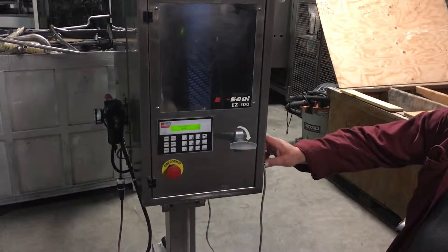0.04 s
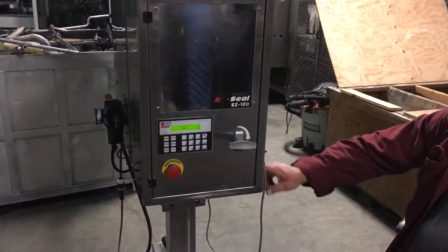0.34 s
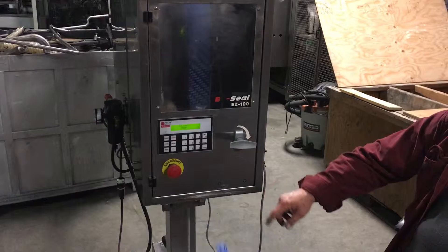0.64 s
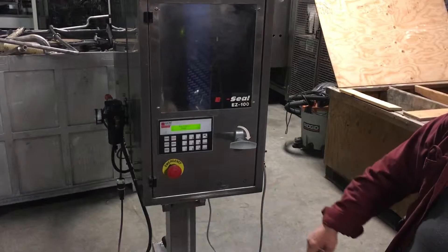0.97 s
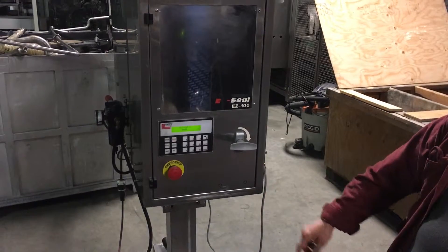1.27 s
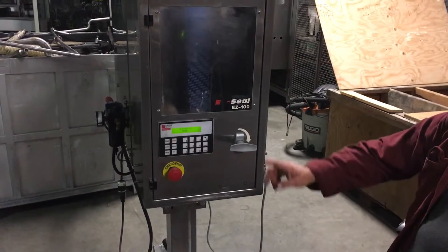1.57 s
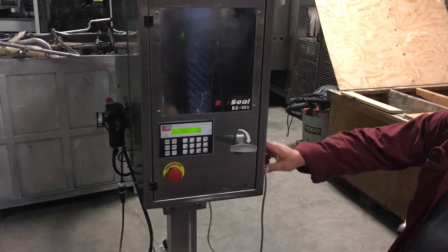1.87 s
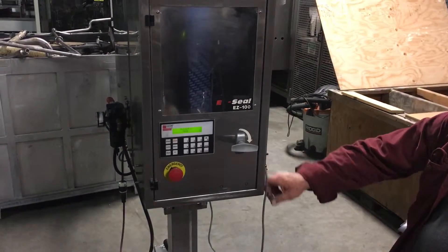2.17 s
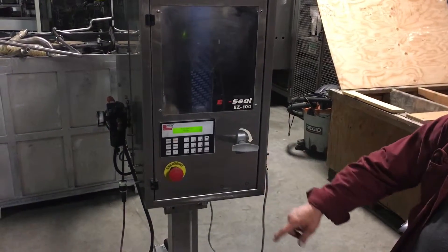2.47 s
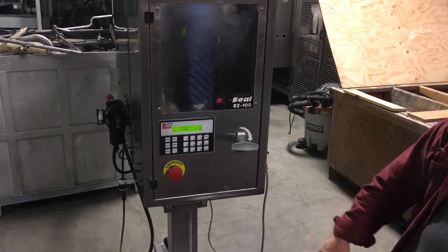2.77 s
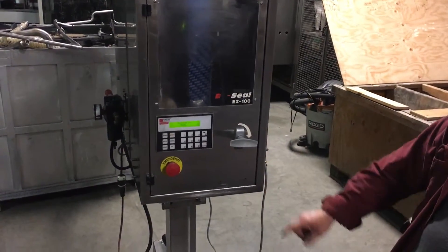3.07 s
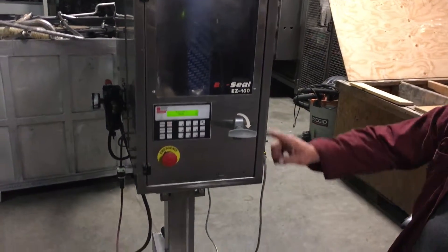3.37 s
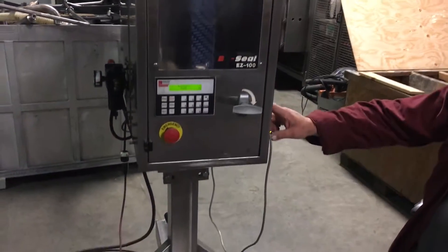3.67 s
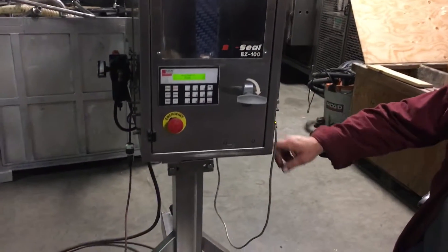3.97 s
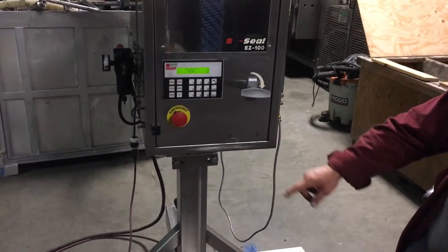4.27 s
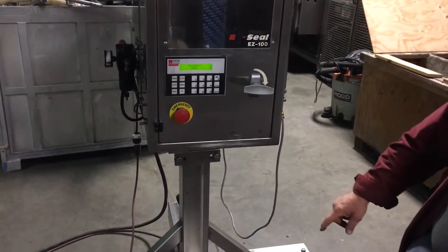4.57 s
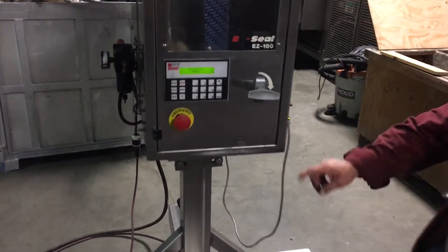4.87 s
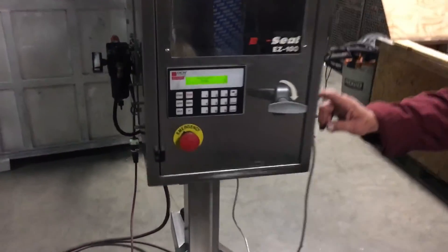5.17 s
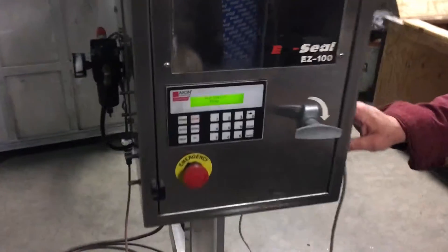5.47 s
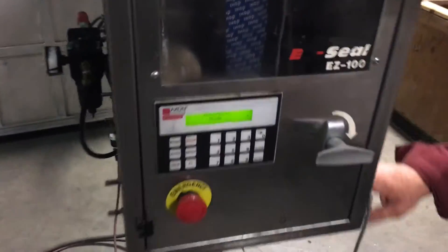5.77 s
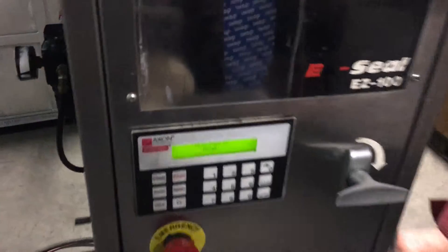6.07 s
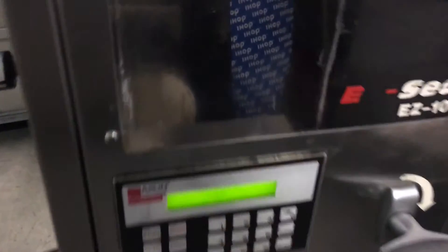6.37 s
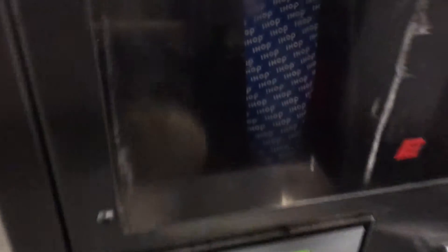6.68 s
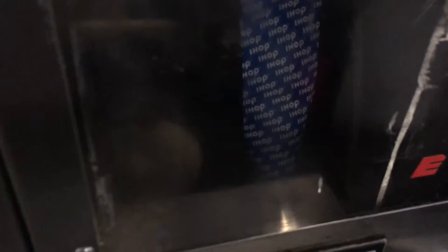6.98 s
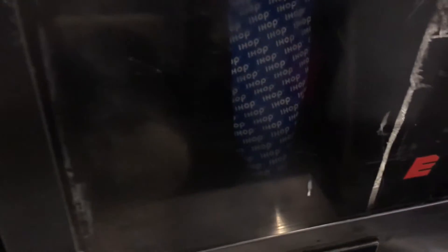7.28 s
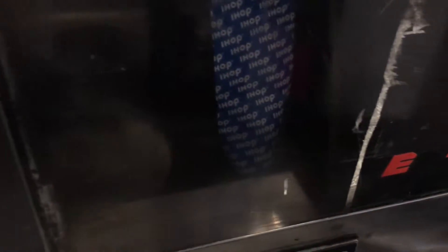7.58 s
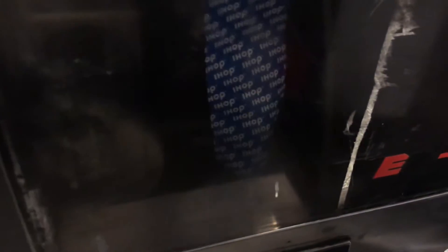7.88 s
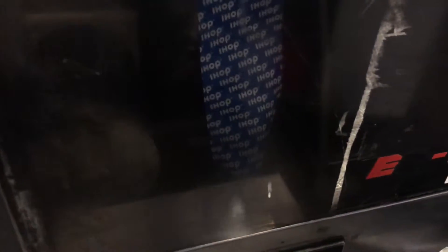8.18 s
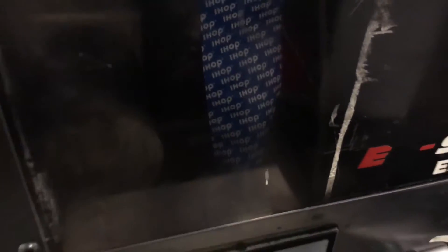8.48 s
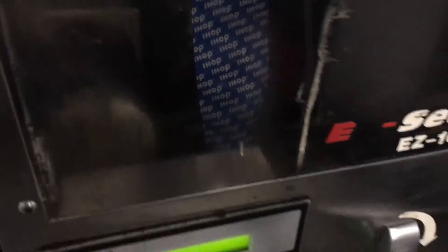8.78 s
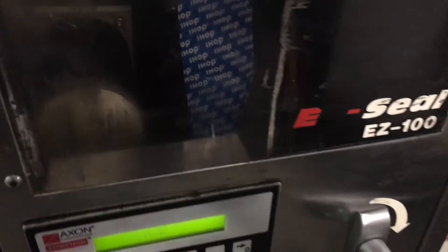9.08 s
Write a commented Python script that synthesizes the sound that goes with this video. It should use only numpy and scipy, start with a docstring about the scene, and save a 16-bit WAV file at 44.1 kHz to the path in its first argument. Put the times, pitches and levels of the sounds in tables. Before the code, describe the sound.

A low warehouse hum and steady hiss run throughout, with the thin whine and very high singing of a labelling machine's idle motors. The machine runs five cycles, starting at about 0.5, 2.2, 4.0, 5.9 and 7.7 seconds, each lasting roughly 0.7 seconds. In each, the drive jolts, metal clacks twice with a short steely ring, plastic film scrapes faintly, and air valves spit twice, with a blade knocking between the spits. The motors then brake with a rattling thud, and the steel cabinet booms briefly with a short echo. The whine drops out during each cycle and returns afterwards. Faint ticks come near 1.3, 3.0, 6.7 and 7.0 seconds. The microphone stands back at first and moves up to the cabinet from about 5 seconds, so the last two cycles are louder, with more deep rumble.

```python
"""A warehouse hums, and the held motors of a shrink-sleeve labelling machine whine and hiss over it.
The machine is jogged through five cycles. In each the drive jolts, metal clacks twice on its end stops,
air valves spit twice, and stepper motors brake and shake the steel cabinet.
The microphone stands back at first, then moves up to the cabinet window for the last two cycles."""
import sys
import numpy as np
from scipy import signal
from scipy.fft import rfft, irfft, next_fast_len
from scipy.io import wavfile
from scipy.ndimage import uniform_filter1d

SR = 44100
rng = np.random.default_rng(int(sys.argv[2]) if len(sys.argv) > 2 else 0)


def log_audio(samples):
    """Write samples as a 16-bit WAV file to the path given in sys.argv[1]."""
    # one column per channel
    frames = np.atleast_2d(samples).T
    # limit to full scale, then quantise
    limited = np.clip(frames, -1, 1)
    pcm = np.round(limited * 32767).astype(np.int16)
    wavfile.write(sys.argv[1], SR, pcm)


N = 407043
T = np.arange(N) / SR

# Presses of the jog button. Each row: start in seconds, slack in the drive in seconds, level offsets
# in dB of first clack, feed brake and film scrape, lateness of the stop in seconds.
CYCLES = [(0.456, 0.025, -6, 0.5, -1, 0), (2.245, 0, 0, -1.5, 1.5, 0), (4.026, 0, 0, -19, 6.5, 0.014),
          (5.863, 0, 0, 0.5, 1.5, 0), (7.653, 0, -0.5, -0.5, 3, 0)]
# The steel of the mechanism. Each row: frequency in Hz, width in Hz, relative level in dB.
STEEL_MODES = [(576.4, 9.4, 4), (701, 22, 4), (800, 50, -6), (897, 43, 9), (1020, 33, -14), (1110, 33, -3),
               (1540, 120, 1), (1726, 100, -3.5), (2070, 66, -16), (2310, 140, -5.5), (5920, 72, -7),
               (6430, 68, -6.5), (7100, 67, -5.5), (9500, 110, -8)]
# The colour of rattling parts. Each row: frequency in Hz, relative level in dB.
RATTLE_COLOUR = [(40, -40), (100, -25), (200, 19), (350, 5), (480, 9), (620, 7.5), (900, 2.5), (1600, -7.5),
                 (2600, -10.5), (4400, -12), (7000, -37), (16000, -56)]


def from_db(db):
    return 10 ** (np.asarray(db) / 20)


def rms_one(x):
    return x / np.sqrt(np.mean(x ** 2) + 1e-20)


def at_hz(points, hz):
    """A curve read on a log-frequency axis."""
    f, value = np.transpose(points)
    return np.interp(np.log(np.maximum(hz, 1)), np.log(f), value)


def convolve(x, response):
    """Pass x through a response scaled to unit energy."""
    return signal.fftconvolve(x, response / np.linalg.norm(response))[:N]


def noise(colour):
    """Steady noise of a given colour, rms 1."""
    size = next_fast_len(N)
    gain = from_db(at_hz(colour, np.fft.rfftfreq(size, 1 / SR)))
    return rms_one(irfft(rfft(rng.standard_normal(size)) * gain, size)[:N])


def drift(rate_hz):
    """A slow random wander, rms 1."""
    return rms_one(np.interp(T * rate_hz, np.arange(400), rng.standard_normal(400)))


def whistle(hz, width_hz):
    """A breathy tone: slow noise carried on a steady or moving pitch, rms 1."""
    lowpass = signal.butter(2, width_hz / 2, fs=SR, output="sos")
    slow = signal.sosfilt(lowpass, rng.standard_normal((2, N)))
    phase = 2 * np.pi * np.cumsum(np.full(N, hz)) / SR
    return rms_one(slow[0] * np.cos(phase) + slow[1] * np.sin(phase))


def play(events, shape):
    """One copy of shape for each event, a row of start in seconds and level in dB."""
    out = np.zeros(N + len(shape))
    for s, db in events:
        start = max(round(s * SR), 0)
        out[start:start + len(shape)] += from_db(db) * shape
    return out[:N]


def swell(rise_s, decay_s):
    """An envelope that climbs to 1 and dies away."""
    t = T[:SR // 2]
    return np.minimum(t / rise_s, 1) ** 2 * np.exp(-np.maximum(t - rise_s, 0) / decay_s)


def ring(force, modes):
    """Resonances driven by a force: damped sines, the wider the shorter."""
    t = T[:SR // 2]
    sines = ((-1) ** k * from_db(db) * width * np.exp(-np.pi * width * t) * np.sin(2 * np.pi * hz * t)
             for k, (hz, width, db) in enumerate(modes))
    return convolve(force, sum(sines))


def boom(force, modes, build_s):
    """Slowly dying low modes that build up as the blow spreads through the metal."""
    t = T[:SR]
    sway = sum(from_db(db - 60 * t / t60) * np.sin(2 * np.pi * hz * t) for hz, db, t60 in modes)
    return convolve(force, sway * np.minimum(t / build_s, 1))


def nearness(s):
    """The microphone's approach at time s, as a gain in dB that each source scales for itself."""
    # The walk up to the cabinet window. Each row: time in seconds, gain in dB.
    approach = [(0, 0), (4.8, 0), (6.1, 4), (7.6, 5), (9.2, 5)]
    return np.interp(s, *np.transpose(approach))


def each_cycle(steps, follows=0, late_s=0, extra_db=0):
    """Repeat steps (seconds into the cycle, dB) in all cycles; follows scales the approach gain."""
    starts = np.array(CYCLES)[:, 0] + late_s
    return np.vstack([np.column_stack([starts + s, db + extra_db + follows * nearness(starts + s)])
                      for s, db in steps])


def pause(off_s, on_s, return_s):
    """A gain that falls quickly to 0 in every cycle and later climbs back to 1."""
    return 1 - sum(np.clip((T - start - off_s) / 0.015 + 1, 0, 1)
                   * np.clip(1 - (T - start - on_s) / return_s, 0, 1) for start, *_ in CYCLES)


def room_tone():
    """The warehouse's rumble, a steady hiss and the low hum of motors."""
    # The colours of rumble and hiss. Each row: frequency in Hz, relative level in dB.
    rumble_colour = [(20, -36), (35, -9), (54, 2), (82, -7.5), (150, -7.5), (200, -10), (320, -23.5),
                     (450, -15), (680, -16), (900, -22), (1400, -15), (2000, -21.5), (2800, -36),
                     (6000, -61)]
    hiss_colour = [(1500, -25), (2650, -16.5), (3500, -10.5), (5000, -8.5), (7800, -8), (9500, -8),
                   (11000, -6), (13000, -7.5), (16000, -6)]
    # Motor hum. Each row: frequency in Hz, rms level in dB.
    hum_tones = [(58, -58.5), (148, -63)]
    hum = sum(from_db(db) * whistle(hz, width_hz=2.8) for hz, db in hum_tones)
    rumble = from_db(-51.5 + 0.73 * nearness(T)) * noise(rumble_colour)
    hiss = from_db(-47 + 0.31 * nearness(T)) * noise(hiss_colour)
    return rumble + hiss + hum


def hall(x):
    """The warehouse's diffuse reverberation, each octave dying at its own pace."""
    # The tail's colour. Each row: frequency in Hz, relative level in dB.
    colour = [(120, -5), (400, -0.5), (900, -4), (1800, -1.1), (3600, -0.5), (7000, -3), (14000, -6.5)]
    # Its length. Each row: frequency in Hz, seconds to fall 60 dB.
    t60 = [(100, 0.32), (500, 0.61), (2000, 0.5), (6000, 0.64), (16000, .3)]
    t, tails = T[:SR], 0
    for low_hz in 80 * 2 ** np.arange(8):
        octave = signal.butter(2, [low_hz, 2 * low_hz], "band", fs=SR, output="sos")
        band = signal.sosfilt(octave, rng.standard_normal((2, SR)))
        centre_hz = low_hz * np.sqrt(2)
        tails = tails + band * from_db(at_hz(colour, centre_hz) - 60 * t / at_hz(t60, centre_hz))
    one, other = (convolve(x, tail * np.minimum(t / 0.0032, 1)) for tail in tails)
    # Two tails blend at random, so the echo shimmers instead of ringing on fixed pitches.
    blend = 2 * np.pi * drift(rate_hz=3)
    return one * np.cos(blend) + other * np.sin(blend)


def held_motors():
    """Chopped holding current makes the motors whine and sing while they stand still."""
    # The whine at rest. Each row: time in seconds, pitch in Hz, rms level in dB.
    whine_curve = [(0, 1247, -55.5), (4, 1245, -55.5), (5.7, 1247, -52), (7.2, 1342, -55), (9.2, 1268, -58)]
    # The highest singing. Each row: frequency in Hz, width in Hz, relative level in dB.
    singing_bands = [(9810, 630, -3), (12250, 740, -3), (14650, 700, -3.5)]
    surge_s, surge_db = 0.05, 5.5   # the whine is louder while the drive first takes up load
    times, pitches, levels = np.transpose(whine_curve)
    loaded = sum((T > start) & (T < start + surge_s) for start, *_ in CYCLES)
    whine_db = np.interp(T, times, levels) + surge_db * loaded
    whine = from_db(whine_db) * whistle(np.interp(T, times, pitches), width_hz=95)
    whine += from_db(-66 + 1.5 * nearness(T)) * whistle(1694, width_hz=45)
    whine *= pause(off_s=surge_s, on_s=0.74, return_s=0.23)
    singing = whistle(8770 + 60 * drift(rate_hz=9.4), width_hz=460)
    singing += sum(from_db(db) * whistle(hz, width) for hz, width, db in singing_bands)
    singing *= from_db(-55.5 + 0.52 * nearness(T) + 1.6 * drift(rate_hz=6))
    singing *= pause(off_s=0.04, on_s=0.48, return_s=0.17)   # silent while the film is fed
    return whine + singing


def loose_parts():
    """Loose parts knock in every cycle and faintly ring the steel."""
    # Each row: seconds into the cycle, relative level in dB from afar.
    tap_steps = [(0.206, -10), (0.494, -12), (0.619, -17.5)]
    knocks = play(each_cycle(tap_steps, follows=1.1), swell(0.0026, 0.036))
    rattle = from_db(-21.5) * knocks * noise(RATTLE_COLOUR)
    return rattle + from_db(-36) * ring(knocks * rng.standard_normal(N), STEEL_MODES)


def sleeve_ticks():
    """Now and then a cut sleeve ticks against the frame."""
    # Each row: start in seconds, relative level in dB.
    ticks = [(1.332, -24.5), (3.020, -24), (6.663, -26), (6.952, -28)]
    # Each row: frequency in Hz, relative level in dB.
    tick_colour = [(300, -50), (1500, -12), (2400, -8), (3000, -7.5), (3650, 2.5), (4400, -7), (7000, -7),
                   (16000, -10)]
    return from_db(-11) * play(ticks, swell(0.00037, 0.014)) * noise(tick_colour)


def film(slack_s, scrape_db):
    """Grainy friction: the film is pulled taut, rubs along, and skids on when the feed stops."""
    # Rubs on the guide and past the blade. Each row: seconds into the cycle, relative level in dB.
    rub_steps = [(0.234, -14.5), (0.386, -8), (0.402, -12.5)]
    # Each row: frequency in Hz, relative level in dB.
    rub_colour = [(500, 10.5), (1500, 14.5), (2800, 6.5), (3800, 6), (6500, 2), (10000, 0), (16000, -5)]
    pulls = each_cycle([(0.09, -14)], late_s=slack_s)
    skids = each_cycle([(0.336, -13.5)], extra_db=scrape_db)
    rubs = play(np.vstack([pulls, each_cycle(rub_steps), skids]), swell(0.007, 0.014))
    grain_db = 1.6 * rms_one(uniform_filter1d(rng.standard_normal(N), size=40))
    return from_db(-16) * rubs * rms_one(from_db(grain_db)) * noise(rub_colour)


def cabinet(shake, blows, cuts, returns):
    """The panels boom on after every shake and blow; deep rumble carries only close by."""
    # Each row: frequency in Hz, relative level in dB, seconds to fall 60 dB.
    panel_modes = [(67.8, -20, 0.96), (116.4, -19.5, 0.97), (165, -4.5, 0.39), (190.8, 4.5, 0.26),
                   (232, 1.5, 0.17), (258.4, -3.5, 0.21), (446, -5, 0.28)]
    push = np.hanning(SR // 700)
    force = from_db(-30) * shake + from_db(-17) * play(blows, push)
    force += from_db(-22.5) * play(returns + [0.016, 0], push) + from_db(-27) * play(cuts, push)
    deep = noise([(30, -28), (50, 0), (68, 10.5), (90, -1), (130, 0), (250, -56)])
    rumble = from_db(-47.5 + 2.4 * nearness(T)) * play(blows, swell(0.053, 0.88)) * deep
    return boom(force, panel_modes, build_s=0.0057) + rumble


def carriage(rests):
    """The carriage is struck as its motor stalls, and rings on its rails."""
    # Each row: frequency in Hz, relative level in dB, seconds to fall 60 dB.
    carriage_modes = [(146.6, 1.5, 0.62), (184, 3, 0.19), (232.3, 5.5, 0.23), (261, -2, 0.12),
                      (286, 3, 0.41), (344, -10, 0.42), (371, -3, 0.34), (511, -4, 0.23), (578, -12, .25),
                      (652, -6, .2), (735, -7, 0.29)]
    stall = play(rests + [0.012, 0], np.hanning(SR // 1100))
    return from_db(-8) * boom(stall, carriage_modes, build_s=0.011)


def braking(from_hz, to_hz, knee_s, peak_s, lead_s, fade_s):
    """A stepper's falling step rate: the shaking grows as it nears the frame's resonance, then dies."""
    t = T[:SR // 8]
    hz = to_hz + (from_hz - to_hz) / (1 + (t / knee_s) ** 6)
    size = np.exp(np.minimum((t - peak_s) / lead_s, (peak_s - t) / fade_s)) * np.minimum(t / 0.0067, 1)
    return size * np.sin(2 * np.pi * np.cumsum(hz) / SR)


def drive(jolts, feed_stops, rests):
    """The motors take up load and brake: returns the frame's low shaking and the rattle with it."""
    # The rattle as the carriage comes to rest. Each row: frequency in Hz, relative level in dB.
    rest_colour = [(40, -30), (100, -29), (250, 5.5), (370, 2.5), (500, -1), (700, -2), (1000, -5.5),
                   (1600, -1.5), (2300, -12), (3600, -16.5), (4450, -7.5), (5200, -17.5), (9000, -35),
                   (16000, -36)]
    sway = swell(0.0022, 0.0053) * np.sin(2 * np.pi * 191 * T[:SR // 2])   # heavy and well damped
    feed_brake = braking(from_hz=385, to_hz=195, knee_s=0.0125, peak_s=0.019, lead_s=0.007, fade_s=0.008)
    halt = braking(from_hz=323, to_hz=205, knee_s=0.009, peak_s=0.0171, lead_s=0.0096, fade_s=0.0025)
    shake = from_db(-1.5) * play(jolts, sway) + from_db(3) * play(feed_stops, feed_brake)
    shake += from_db(1.5 + 0.5 * nearness(T)) * play(rests, halt)
    jostle = from_db(-10.5) * play(jolts, swell(0.0032, 0.017))
    jostle += from_db(-13.5) * play(feed_stops, swell(0.008, 0.042))
    settle = from_db(-13) * play(rests, swell(0.0068, 0.029))
    return shake, jostle * noise(RATTLE_COLOUR) + settle * noise(rest_colour)


def gust(lead_s, decay_s):
    """A valve's flow: it grows for 15 ms while the spool moves, then the line empties."""
    t = T[:SR // 4] - 0.015
    return np.exp(np.minimum(t / lead_s, -t / decay_s))


def cutter_stroke(vents, cuts):
    """Air spits from the exhaust port, and the blade knocks at the end of its stroke."""
    # The venting air. Each row: frequency in Hz, relative level in dB.
    air_colour = [(240, -6), (400, -1), (1160, -12.5), (1560, -0.5), (1820, -3.5), (2750, -9), (3310, -2.5),
                  (5690, -6), (9180, -4), (10400, -10), (13700, -2), (14800, -2.5), (16000, -1.5)]
    # Each row: frequency in Hz, width in Hz, relative level in dB.
    port_modes = [(1510, 60, -10), (3080, 110, 2), (3900, 110, -3), (5950, 340, 9), (8100, 80, 9),
                  (9300, 290, 15), (14840, 260, 20)]
    flow = play(vents, gust(lead_s=0.0024, decay_s=0.0065))
    snap = play(vents, gust(lead_s=0.0001, decay_s=0.00031))   # the spool hits its seat
    air = (from_db(-1.5) * flow + from_db(-18) * snap) * noise(air_colour)
    port = from_db(-9.5) * ring(flow * rng.standard_normal(N), port_modes)
    knock = play(cuts, swell(0.0017, 0.0082))
    rattle = from_db(-9.5) * knock * noise(RATTLE_COLOUR)
    steel = from_db(-17.5) * ring(knock * rng.standard_normal(N), STEEL_MODES)
    return air + port + rattle + steel


def cutter_return(returns):
    """A second puff of air, and the slide rings as the cutter runs home."""
    # The puff. Each row: frequency in Hz, relative level in dB.
    air_colour = [(290, -44), (500, -34.5), (668, -17), (1030, -2), (1250, -10.5), (2010, 2.5),
                  (2980, -12.5), (3590, -4), (4940, -10.5), (5710, -5.5), (10700, -14), (13300, -7),
                  (16000, -14)]
    # Each row: frequency in Hz, width in Hz, relative level in dB.
    slide_modes = [(635, 35, 6.5), (685, 57, 5), (869, 51, 2.5), (1250, 97, 0.5), (1460, 92, 1),
                   (1594, 87, -4), (2010, 140, -6)]
    puff = from_db(-6) * play(returns, gust(lead_s=0.0046, decay_s=0.0075)) * noise(air_colour)
    force = play(returns, gust(lead_s=0.0028, decay_s=0.0031)) * rng.standard_normal(N)
    return puff + from_db(-5.5) * ring(force, slide_modes)


def clacks(blows):
    """Metal hits its end stops and rings the steel; the parts chatter for some milliseconds after."""
    # The clack's bright edge. Each row: frequency in Hz, relative level in dB.
    treble_colour = [(1180, -40), (2000, 8), (2780, -0.5), (6040, 1), (8700, -7.5), (9410, -7),
                     (10400, -10), (13600, -7), (16000, -23)]
    impact = play(blows, np.ones(1))
    chatter = play(blows, swell(0.0021, 0.0025)) * rng.standard_normal(N)
    body = ring(from_db(14.5) * impact + from_db(-5.5) * chatter, STEEL_MODES)
    t = T[:SR // 2]
    # Parts bounce hard for a moment, then settle all at once.
    clatter = np.minimum(t / 0.002, 1) * np.exp(-np.minimum(t / 0.011, 10) ** 2)
    bounces = from_db(-3.5) * clatter + from_db(-26.5) * swell(0.018, 0.028)
    crack = play(blows, bounces) * noise([(300, -25), (550, -4), (850, 2.5), (1150, 1.5), (1450, -1.5),
                                          (1800, -0.5), (2700, -39.5), (8000, -26)])
    screened = from_db(-9.5 - 0.68 * nearness(T))   # close up, the window screens the treble
    treble = screened * play(blows, swell(0.0051, 0.011)) * noise(treble_colour)
    return body + crack + treble


def scene():
    """Five cycles at one microphone: the machine works, its cabinet booms and the hall answers."""
    # The drive takes up load. Each row: seconds into the cycle, relative level in dB from afar.
    jolt_steps = [(0, -26), (0.082, -17.5)]
    _, slack_s, clack_db, brake_db, scrape_db, late_stop_s = np.transpose(CYCLES)
    jolts = each_cycle(jolt_steps, follows=1.53, late_s=slack_s)
    first_blows = each_cycle([(0.115, -10)], follows=0.79, late_s=0.53 * slack_s, extra_db=clack_db)
    second_blows = each_cycle([(0.255, -11.5)], follows=0.66)
    blows = np.vstack([first_blows, second_blows])
    feed_stops = each_cycle([(0.3365, -11)], follows=0.95, extra_db=brake_db)
    vents = each_cycle([(0.365, -7)], follows=0.05)
    cuts = each_cycle([(0.404, -9.5)], follows=0.66)
    returns = each_cycle([(0.521, -7.3)], follows=0.2)
    rests = each_cycle([(0.676, -14)], follows=0.5, late_s=late_stop_s)
    shake, rattle = drive(jolts, feed_stops, rests)
    machine = shake + rattle + clacks(blows) + cutter_stroke(vents, cuts) + cutter_return(returns)
    machine += loose_parts() + sleeve_ticks() + film(slack_s, scrape_db)
    booming = cabinet(shake, blows, cuts, returns) + carriage(rests)
    return (machine + booming + from_db(-12) * hall(machine) + held_motors() + room_tone())[None]


def record(dry):
    """The microphone sheds deep bass, loud peaks are rounded and the top is cut."""
    low_cut_hz, high_cut_hz, ceiling = 38, 15900, 0.73
    thin = signal.sosfilt(signal.butter(2, low_cut_hz, "high", fs=SR, output="sos"), dry)
    rounded = ceiling * np.tanh(thin / ceiling)
    return signal.sosfilt(signal.ellip(12, 0.1, 70, high_cut_hz, fs=SR, output="sos"), rounded)


dry = scene()
out = record(dry)
log_audio(out)
```